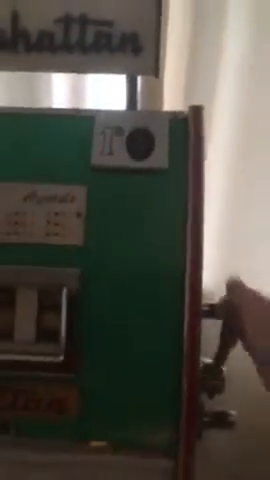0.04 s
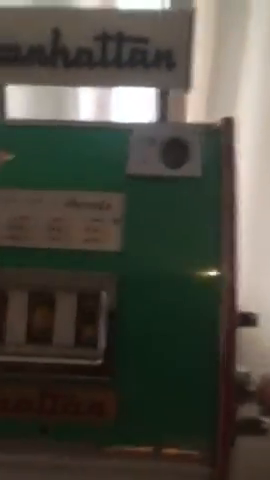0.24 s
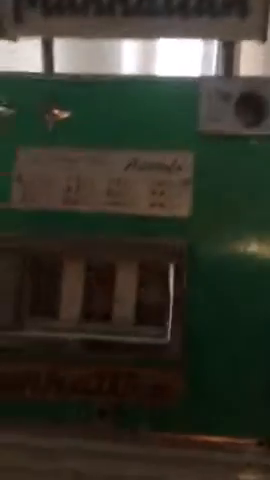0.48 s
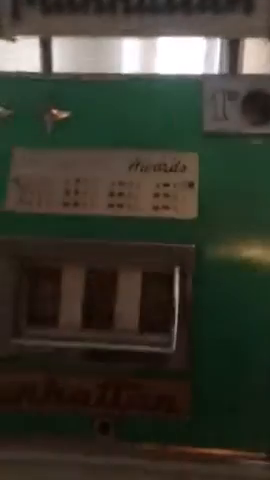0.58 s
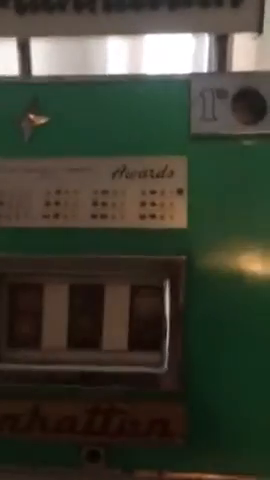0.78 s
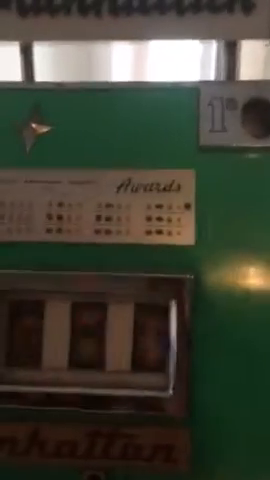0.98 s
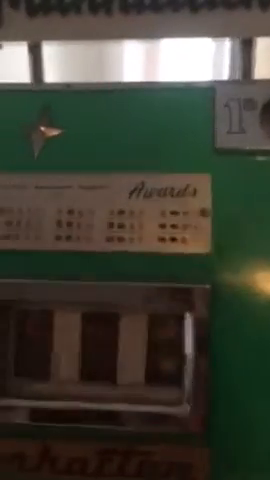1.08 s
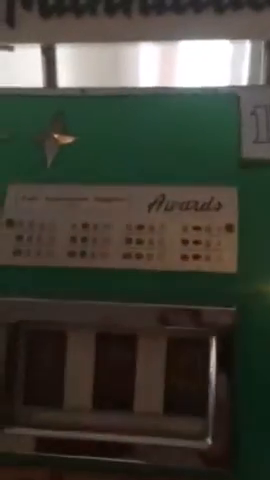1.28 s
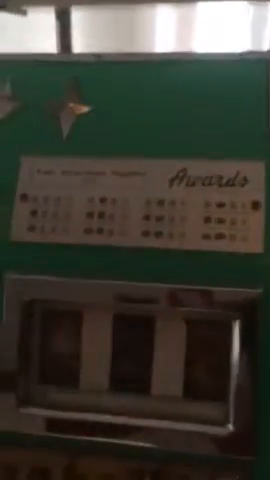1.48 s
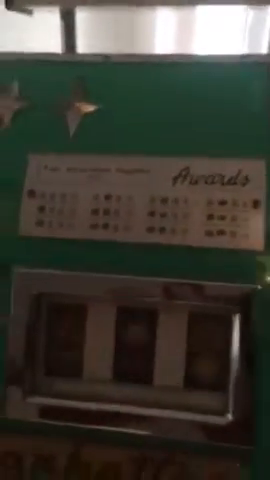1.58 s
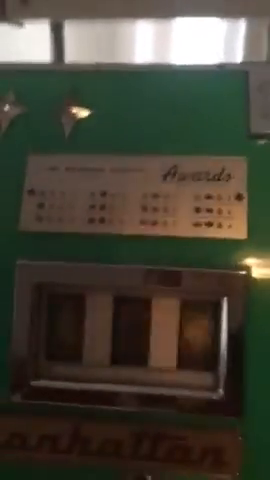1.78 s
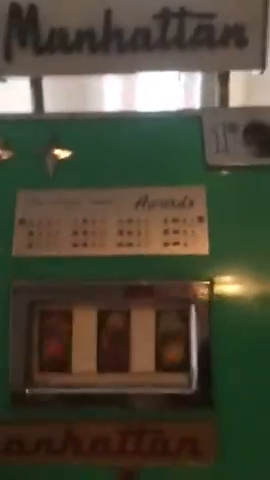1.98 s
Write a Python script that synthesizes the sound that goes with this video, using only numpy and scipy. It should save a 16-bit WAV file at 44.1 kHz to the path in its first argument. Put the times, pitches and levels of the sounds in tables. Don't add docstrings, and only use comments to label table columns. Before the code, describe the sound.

An old mechanical slot machine, close up in a small room: the lever ratchets down with steel clicks and slams with a woody boom, a coin tumbles and rings through the chute, then quick ticking gradually slows.

```python
import sys
import numpy as np
from scipy import signal
from scipy.fft import rfft, irfft
from scipy.io import wavfile

SR = 44100
rng = np.random.default_rng(int(sys.argv[2]) if len(sys.argv) > 2 else 0)


def natural_amplitude(level_db):
    exponent = np.asarray(level_db, float) / 20
    return 10 ** exponent


def unload_audio(sound):
    columns = np.transpose(np.atleast_2d(sound))
    steps = np.round(np.clip(columns, -1, 1) * 32767)
    wavfile.write(sys.argv[1], SR, steps.astype(np.int16))


N = 88200

# pitch_hz, level_db
FLOOR = [(15, -43), (45, -5.5), (212, -5.5), (335, -15), (887, -21), (1100, -16), (2550, -22), (16000, -41)]
# pitch_hz, level_db, t60_s (time to die away by 60 dB)
REELS = [(154.6, -79, 0.16), (199.6, -60.5, 0.05)]
# start_s, panel_db, front_db, knock_db
THUMPS = [(.103, -64, -46, -52), (0.204, -45, -43.5, -42), (0.25, -39.5, -38, -31),
          (0.377, -36, -33, -20.5), (0.439, -30, -38, -29), (.482, -37, -21.5, -22),
          (.503, -18, -24.5, -28), (.56, -49, -21.5, -21), (.587, -27.5, -25, -59), (0.629, -49, -31, -37),
          (.65, -38, -25.5, -28), (0.696, -27, -31, -64), (0.8, -43, -45.5, -70), (0.869, -41, -42.5, -60),
          (1.022, -49, -37, -68), (1.1, -43, -42.5, -55), (1.14, -36, -50, -34), (1.189, -39, -61, -57),
          (1.249, -33, -70, -81), (1.293, -30.5, -37, -25.5), (1.32, -29.5, -24.5, -26.5),
          (1.344, -42.5, -44.5, -63), (1.401, -38, -48, -55)]
# pitch_hz, level_db, t60_s
PANEL_MODES = [(163, -0.5, 0.17), (135.5, -13, .15)]
FRONT_MODES = [(207, 0, 0.25)]
KNOCK_MODES = [(218.8, -3.5, 0.15), (259, -14, .08), (329, -26.5, 0.19), (413, -18, 0.14),
               (603, -27, 0.071)]
# start_s, level_db
SWAYS = [
    (0.218, -56.5),
    (0.408, -51.5),
    (0.522, -47),
    (0.642, -59),
    (0.86, -56.5),
    (1.288, -49),
    (1.356, -60),
    (1.901, -69),
]
# pitch_hz, level_db, t60_s
STAND_MODES = [(45.6, 5.5, 0.3), (73.9, 5, 0.54)]

# start_s, mid_db, low_db, high_db, t60_s
LEVER = [(0.1005, -28, -38, -37.5, 0.079), (0.1553, -27, -38, -36, 0.08),
         (0.1989, -28.5, -34.5, -38.5, 0.1), (0.2436, -25, -34.5, -36, 0.067),
         (0.2586, -36, -39, -38, 0.14), (0.3059, -28.5, -37, -37.5, 0.1), (0.3531, -40, -39, -51.5, 0.21),
         (0.37, -36, -47.5, -42.5, 0.11), (0.383, -25, -33.5, -30.5, 0.11),
         (0.4399, -25.5, -36, -31.5, 0.1), (0.4471, -25.5, -32.5, -45, 0.055),
         (0.4788, -19, -30, -17, 0.048), (0.4825, -18.5, -19, -45, 0.051), (0.5035, -32, -31, -47.5, 0.067),
         (0.5126, -28, -30.5, -43, 0.106), (0.5779, -41.5, -44.5, -42, 0.044)]
# start_s, mid_db, low_db, high_db, t60_s
CHUTE = [(0.619, -22.5, -30.5, -29, 0.11), (0.6424, -23.5, -27.5, -28, 0.06),
         (0.6734, -28, -34.5, -39, 0.1), (0.683, -40, -38.5, -37.5, 0.1),
         (0.7627, -31.5, -58.5, -36.5, 0.064), (0.829, -33, -49.5, -39, 0.14),
         (0.842, -26, -34, -28, 0.081), (0.8518, -35, -56, -26, 0.07), (0.897, -45.5, -53.5, -44, 0.06),
         (0.9315, -40, -51.5, -44, 0.053), (0.9745, -48, -57.5, -46, 0.099),
         (0.9904, -44.5, -49.5, -44, 0.18), (1.0188, -27, -41.5, -26.5, 0.05),
         (1.0275, -28, -39.5, -28.5, 0.05), (1.0305, -27.5, -41, -25.5, 0.06),
         (1.036, -38, -43, -33.5, 0.05), (1.0417, -39, -44.5, -42.5, 0.06), (1.058, -53, -57, -41.5, 0.08),
         (1.0962, -40.5, -43.5, -36, 0.07), (1.107, -48.5, -48, -48.5, 0.1), (1.123, -44.5, -50, -53, 0.08),
         (1.1365, -27, -36, -40, 0.04), (1.141, -31, -35.5, -52, 0.05)]
# start_s, mid_db, low_db, high_db, t60_s
SETTLE = [
    (1.247, -43.5, -44.5, -58, 0.096),
    (1.2614, -34.5, -33, -52.5, 0.039),
    (1.2924, -74, -42.5, -61, 0.077),
    (1.31, -68, -39, -48.5, 0.034),
    (1.533, -53, -62, -74, 0.087),
]
REGISTER_DB = [-4.5, -7, 0.3]
REGISTER_T60 = [1.384, 0.89, 0.63]
# pitch_hz, level_db
MECHANISM = [(350, -2.5), (700, -5), (1000, -1.5), (1700, -4.5), (3600, -6), (5500, -9), (9900, -12),
             (16000, -26.5)]
# pitch_hz, level_db, t60_s
PAWL_MODES = [(1390, -38, 0.027), (3187, -41.5, 0.045)]

LINK_RINGS = [
    (.261, -35, .278),
]
LINK_MODES = [(953, 0, .075), (3494, -2, .07), (3590, -7, .05)]
SLAM_RINGS = [
    (.481, -29.5, 0.503),
    (.505, -28.5, .54),
]
SLAM_MODES = [(1034, 1, 0.041), (1370, -14.5, 0.053), (1625, -10, 0.091), (2530, -6.5, .05)]
LIP_RINGS = [
    (.646, -44, .72),
]
LIP_MODES = [(9006, -1, .4), (4560, 6, .12), (4823, -8, .15)]
RAIL_RINGS = [
    (.68, -59, .75),
]
RAIL_MODES = [(10850, 4, .12), (13710, 0, .24), (14290, 0, .2), (14650, -3, .2)]
TONGUE_RINGS = [
    (.694, -46, .72),
]
TONGUE_MODES = [(6000, 0, .06)]
GATE_RINGS = [
    (.764, -50, .83),
]
GATE_MODES = [(9012, 0, .35), (2810, 11, .09), (4565, -2, .13), (4818, 1, .4), (10905, 1, .11)]
CRADLE_RINGS = [
    (.859, -40, .99),
]
CRADLE_MODES = [(3391, -1, .2), (4296, -5, .18), (6605, -5, .22), (9351, -10, .2), (14740, -10, .2),
                (11370, -12, .15), (8317, -11, .14), (2385, -2, .07), (15150, -13, .1)]
STOP_RINGS = [
    (.977, -42, 1.02),
    (.992, -46, 1.02),
]
STOP_MODES = [(14100, -3, .12), (9345, 0, .2), (6620, -2, .12), (8200, -6, .08)]
CUP_RINGS = [
    (1.033, -42, 1.06),
    (1.098, -49, 1.113),
]
CUP_MODES = [(12540, 0, .09), (8027, -5, .07), (7418, -8, .09), (11410, -10, .12)]
LATCH_RINGS = [
    (1.139, -39, 1.175),
]
LATCH_MODES = [(1195, -3, .07), (1795, -6, .06), (1985, -4, .05), (2300, 0, .06), (2430, -3, .05),
               (3144, -6, .04)]
TAP_RINGS = [
    (1.918, -47, 1.94),
]
TAP_MODES = [(850, 0, .035), (480, -1, .025)]

# start_s, main_pair_db, upper_db, lower_db, share (of the free die-away time)
COIN_RINGS = [(.634, -33, -46, -53, .5), (.652, -46, -47, -55, 1), (.675, -41, -50, -54, .45),
              (.715, -51, -60, -72, .7), (.765, -53, -58, -58, 3), (.842, -36, -42, -40, 1),
              (.858, -32, -34, -44, .8), (.92, -41, -50, -50, 1), (.966, -43, -53, -42, 1),
              (.989, -46, -46, -43, .7), (1.019, -30, -42, -43, .25), (1.029, -25, -37, -41, .22),
              (1.046, -43, -48, -52, .6), (1.073, -46, -46, -56, 1), (1.097, -42, -52, -53, .35),
              (1.12, -53, -58, -58, .6)]
# pitch_hz, level_db, t60_s
COIN_MODES = [
    [(9850, 0, .3), (9886, -4, .22), (9805, -8, .15)],
    [(12915, 0, .25), (12960, -10, .15)],
    [(5655, 0, .4)],
]

# time_s, turns_done
GOVERNOR = [
    (1.327, -1),
    (1.7185, 15),
    (1.7929, 18),
    (1.9965, 26),
]
TEETH_DB = [0, 3, 1.5, 0, 4, -2.5, -5, 6, -1, -2, -12, -1, -3, 4, 0.5, 3, 4.5, -5, -7, -2, 1.5, 0.5, -4,
            4.5, -4, 1, -2, 1]
# pitch_hz, level_db, t60_s
ESCAPEMENT_MODES = [(2477, -4.5, 0.027), (2600, -7.5, 0.016), (893, -7.5, 0.042), (3150, -12.5, 0.0093),
                    (1384, -14, 0.075), (4300, -15.5, 0.016)]


def ring(clicks, hz, t60):
    decay = natural_amplitude(-60 / (t60 * SR))
    turn = 2 * np.pi * hz / SR
    return signal.lfilter([0, np.sin(turn)], [1, -2 * decay * np.cos(turn), decay * decay], clicks + 1e-18)


def body(clicks, modes):
    return sum(natural_amplitude(db) * ring(clicks, hz, t60) for hz, db, t60 in modes)


def colour(x, spectrum):
    hz, db = np.transpose(spectrum)
    f = np.maximum(np.arange(N // 2 + 1) * SR / N, 10)
    gain = natural_amplitude(np.interp(np.log(f), np.log(hz), db))
    y = irfft(rfft(x) * gain, N)
    return y / y.std()


def train(times, dbs):
    out = np.zeros(N)
    places = np.clip((np.asarray(times) * SR).astype(int), 0, N - 1)
    np.add.at(out, places, natural_amplitude(np.asarray(dbs)))
    return out


def butter(x, order, hz, kind):
    return signal.sosfilt(signal.butter(order, hz, kind, fs=SR, output="sos"), x)


def room(x):
    t60_s, treble_t60_s, level_db = 0.34, 0.13, -11
    t = np.arange(SR // 2) / SR
    noise = rng.standard_normal(len(t))
    low = butter(noise, 1, 2500, "low")
    high = noise - low
    tail = low * natural_amplitude(-60 * t / t60_s) + high * natural_amplitude(-60 * t / treble_t60_s)
    tail = tail * (t > .004)
    return natural_amplitude(level_db) * signal.fftconvolve(x, tail / np.sqrt((tail ** 2).sum()))[:N]


def room_noise():
    level_db = -62
    return natural_amplitude(level_db) * colour(rng.standard_normal(N), FLOOR)


def cabinet():
    out = np.zeros(N)
    for hz, db, t60 in REELS:
        hum = ring(rng.standard_normal(N), hz, t60)
        out += natural_amplitude(db) * hum / hum.std()
    start_s, panel_db, front_db, knock_db = np.transpose(THUMPS)
    boom = body(train(start_s, panel_db), PANEL_MODES) + body(train(start_s, front_db), FRONT_MODES)
    knock = body(train(start_s, knock_db), KNOCK_MODES)
    sway = body(train(*np.transpose(SWAYS)), STAND_MODES)
    out += butter(boom, 2, [130, 270], "band")
    out += butter(knock, 2, 170, "high")
    return out + butter(sway, 2, [35, 90], "band")


def steel_grains():
    spacing_hz, peaks_db = 150, 2
    luck_db = 1.5 * rng.standard_normal(N // 40 + 1)
    grains = rng.standard_normal(N) * natural_amplitude(luck_db.repeat(40)[:N])
    hz = np.arange(1, SR / 2 / spacing_hz) * spacing_hz
    peaks = np.c_[hz, peaks_db * rng.standard_normal(len(hz))]
    return colour(colour(grains, MECHANISM), peaks)


def pawl():
    start_s, mid_db = np.transpose(LEVER)[:2]
    out = np.zeros(N)
    for hz, level_db, t60 in PAWL_MODES:
        luck_db = 3 * rng.standard_normal(len(start_s))
        clicks = train(start_s + 0.001936, mid_db + luck_db)
        out += natural_amplitude(level_db + 27.5) * ring(clicks, hz, t60)
    return out


def knocks():
    rise_s = 0.0013
    start_s, mid_db, low_db, high_db, t60_s = np.array(LEVER + CHUTE + SETTLE).T[:, :, None]
    since = np.maximum(np.arange(N) / SR - start_s, 0)
    grains = steel_grains()
    registers = ((280, 1700), low_db), ((1700, 5000), mid_db), ((5000, 16000), high_db)
    out = np.zeros(N)
    for (edges_hz, db), trim_db, share in zip(registers, REGISTER_DB, REGISTER_T60):
        shape = (1 - np.exp(-since / rise_s)) * natural_amplitude(db + trim_db - 60 * since / (t60_s * share))
        band = butter(grains, 3, edges_hz, "band")
        out += band / band.std() * np.sqrt((shape ** 2).sum(axis=0))
    return out + pawl()


def ringing(strikes, modes):
    spread_db, wobble_db, damp_s, rise_s = .5, 2.5, .006, .001
    out = np.zeros(N)
    hz, mode_db, t60 = np.transpose(modes)[:, :, None]
    t = np.arange(9000) / SR
    for start_s, db, damped_s in strikes:
        luck = rng.standard_normal((len(modes), 32))
        waver = np.array([np.interp(t, np.linspace(0, t[-1], 30), row[2:]) for row in luck])
        level = db + mode_db + spread_db * luck[:, :1] + wobble_db * waver - 60 * t / t60
        tones = natural_amplitude(level) * np.sin(2 * np.pi * hz * t + 3 * luck[:, 1:2])
        fade = np.exp(-np.maximum(t - (damped_s - start_s), 0) / damp_s) * np.minimum(t / rise_s, 1)
        first = int(start_s * SR)
        out[first:first + len(t)] += (tones.sum(axis=0) * fade)[:N - first]
    return out


def metal_parts():
    parts = [(LINK_RINGS, LINK_MODES), (SLAM_RINGS, SLAM_MODES), (LIP_RINGS, LIP_MODES),
             (RAIL_RINGS, RAIL_MODES), (TONGUE_RINGS, TONGUE_MODES), (GATE_RINGS, GATE_MODES),
             (CRADLE_RINGS, CRADLE_MODES), (STOP_RINGS, STOP_MODES), (CUP_RINGS, CUP_MODES),
             (LATCH_RINGS, LATCH_MODES), (TAP_RINGS, TAP_MODES)]
    return sum(ringing(strikes, modes) for strikes, modes in parts)


def coin():
    rests_s = 1.143
    ends = [row[0] for row in COIN_RINGS[1:]] + [rests_s]
    out = np.zeros(N)
    for (start_s, *dbs, share), end in zip(COIN_RINGS, ends):
        for db, modes in zip(dbs, COIN_MODES):
            held_modes = np.multiply(modes, [1, 1, share])
            out += ringing([(start_s, db, end)], held_modes)
    return out


def governor():
    tick_db, tock_db, tock_spread_db = -53.5, -57, 2
    tock_turn, tock_jitter_s = .4, .0006
    time_s, turns = np.transpose(GOVERNOR)
    ticks = np.arange(turns[0], turns[-1] + .5)
    level_luck, time_luck = rng.standard_normal((2, len(ticks)))
    tick_s = np.interp(ticks, turns, time_s)
    tock_s = np.interp(ticks + tock_turn, turns, time_s) + tock_jitter_s * time_luck
    levels = np.r_[tick_db + np.array(TEETH_DB), tock_db + tock_spread_db * level_luck]
    return body(train(np.r_[tick_s, tock_s], levels), ESCAPEMENT_MODES)


def scene():
    machine = knocks() + metal_parts() + coin() + governor()
    mix = room_noise() + cabinet() + machine + room(machine)
    return mix[None]


def top_cut(x):
    return signal.sosfilt(signal.butter(12, 16820, fs=SR, output="sos"), x)


def record(dry):
    rounded = .35 * np.tanh(dry / .35)
    cut = signal.sosfilt(signal.cheby2(8, 35, 16500, fs=SR, output="sos"), rounded)
    return top_cut(cut)


dry = scene()
out = record(dry)
unload_audio(out)
```